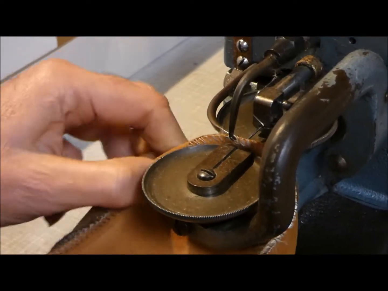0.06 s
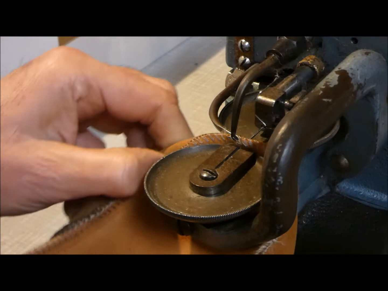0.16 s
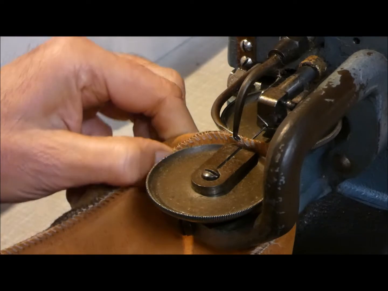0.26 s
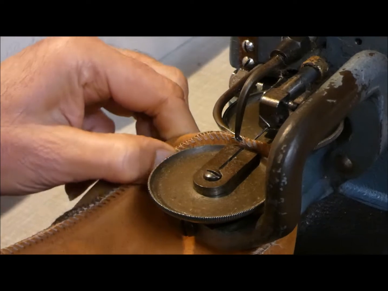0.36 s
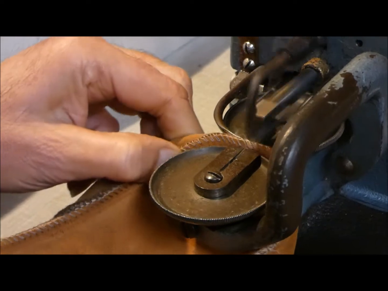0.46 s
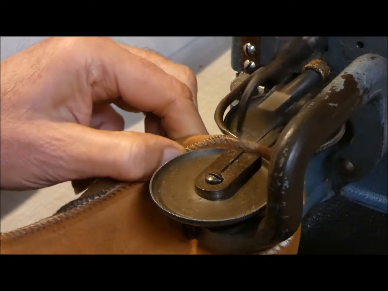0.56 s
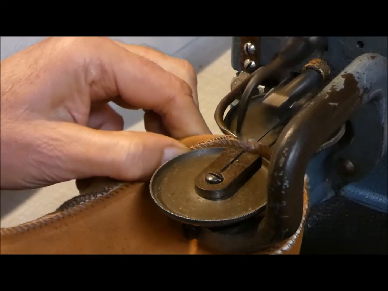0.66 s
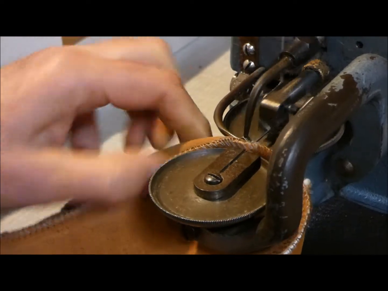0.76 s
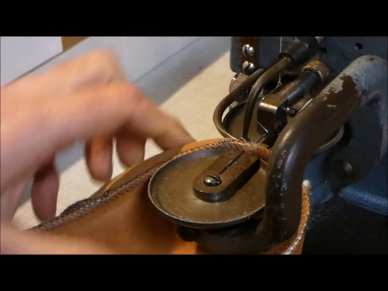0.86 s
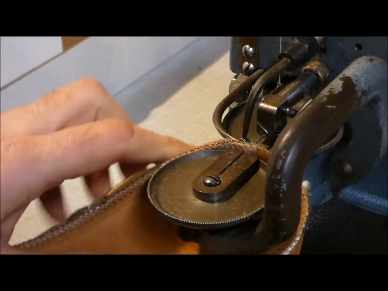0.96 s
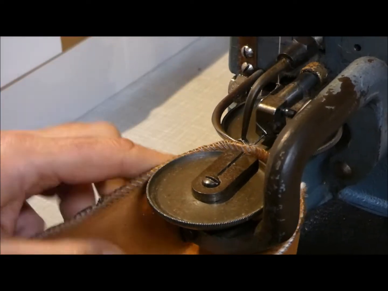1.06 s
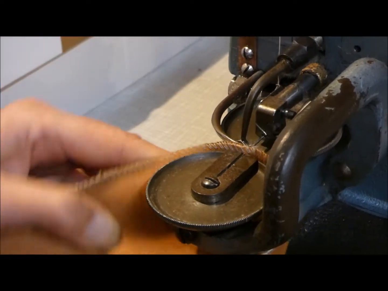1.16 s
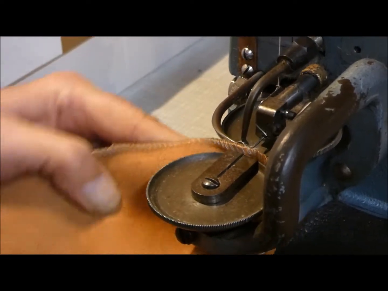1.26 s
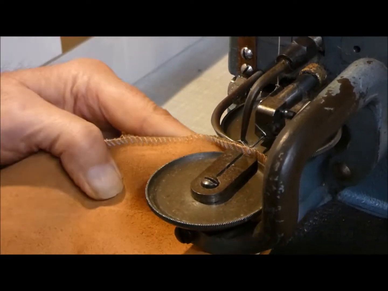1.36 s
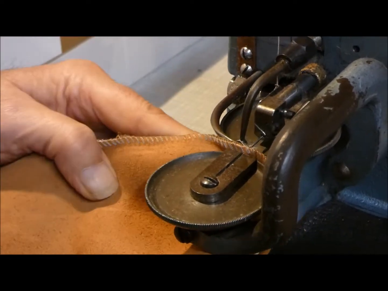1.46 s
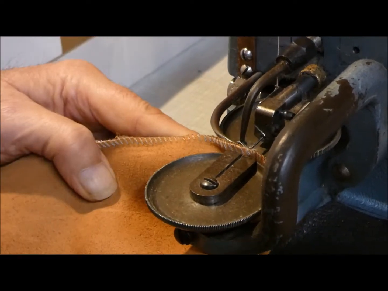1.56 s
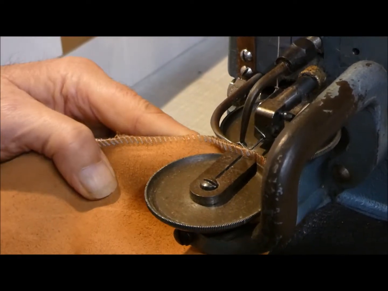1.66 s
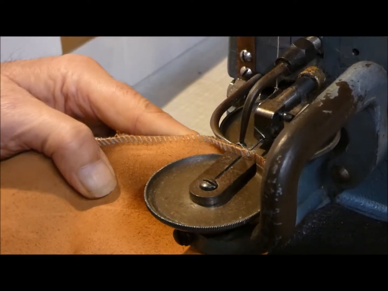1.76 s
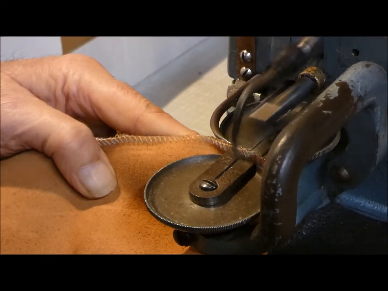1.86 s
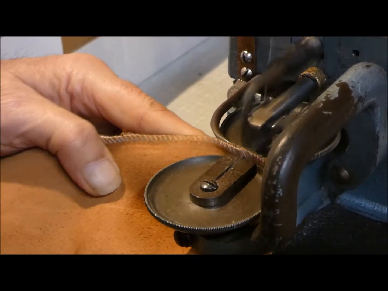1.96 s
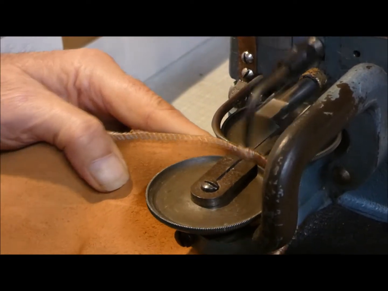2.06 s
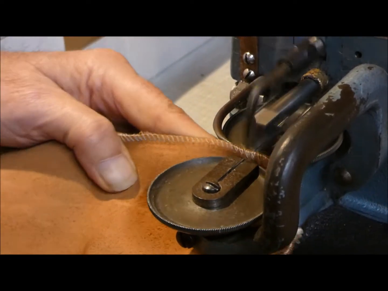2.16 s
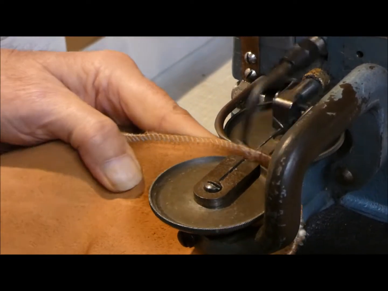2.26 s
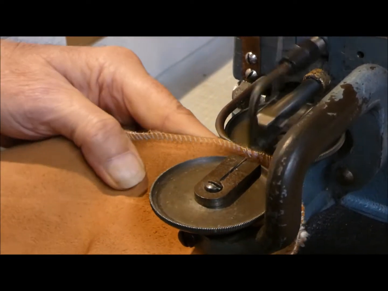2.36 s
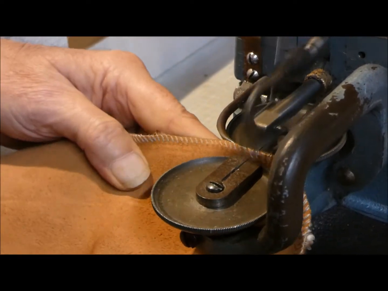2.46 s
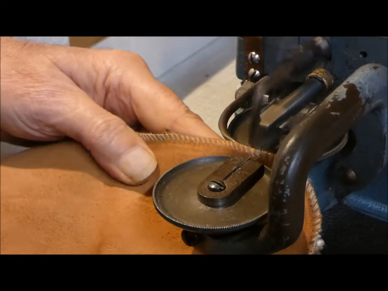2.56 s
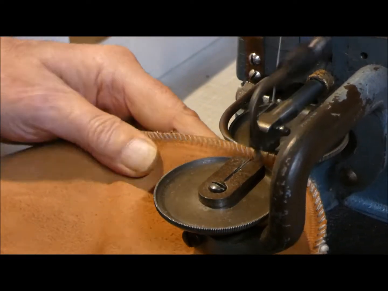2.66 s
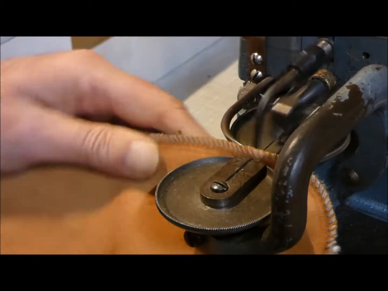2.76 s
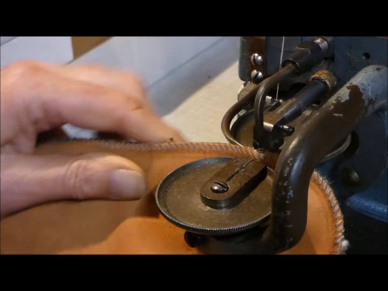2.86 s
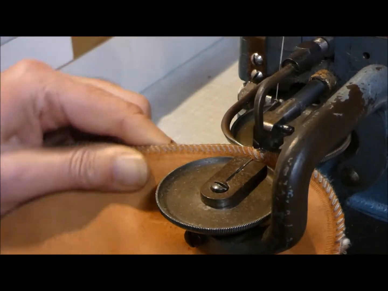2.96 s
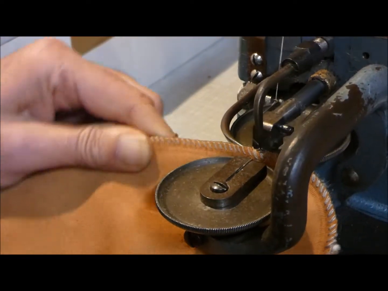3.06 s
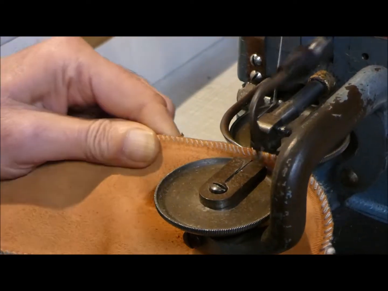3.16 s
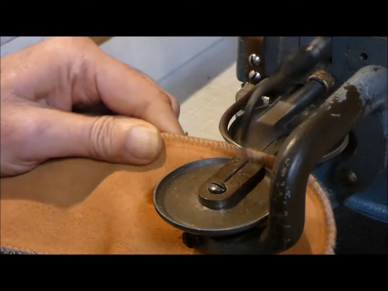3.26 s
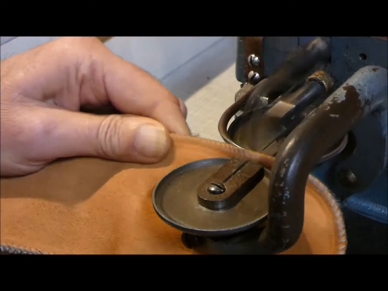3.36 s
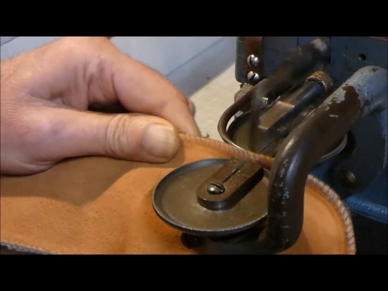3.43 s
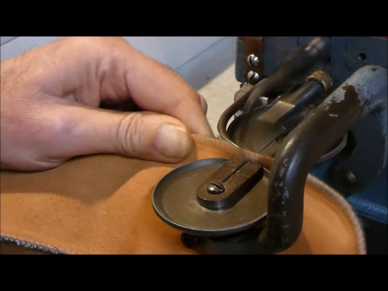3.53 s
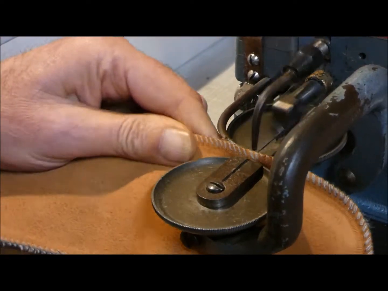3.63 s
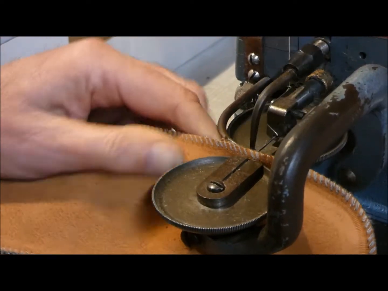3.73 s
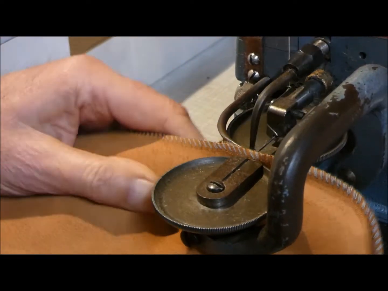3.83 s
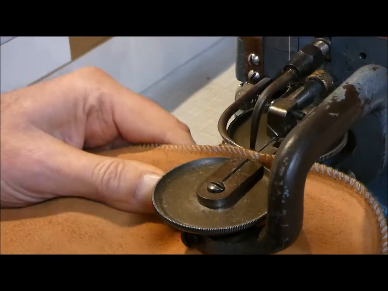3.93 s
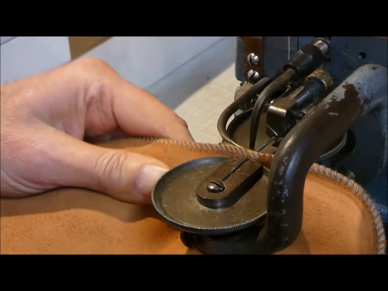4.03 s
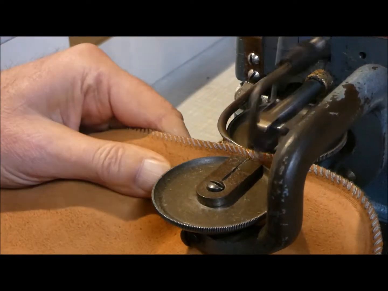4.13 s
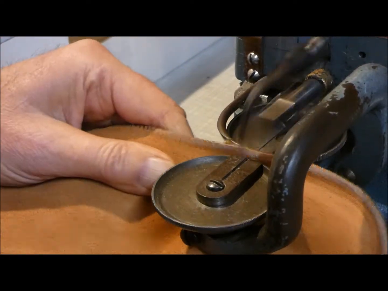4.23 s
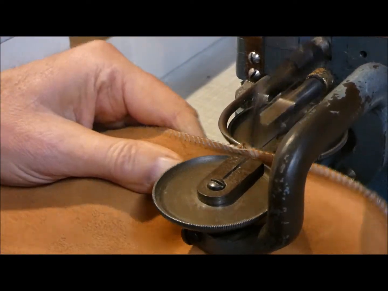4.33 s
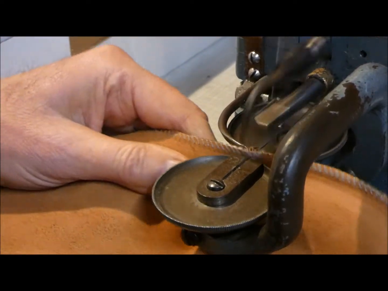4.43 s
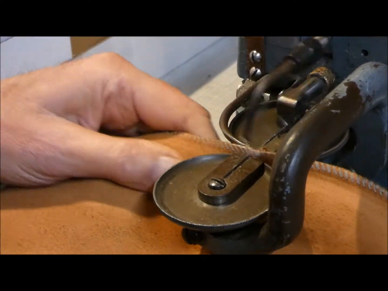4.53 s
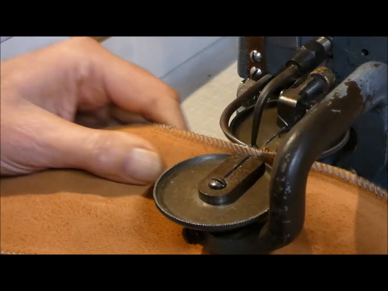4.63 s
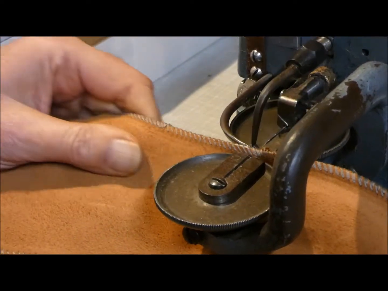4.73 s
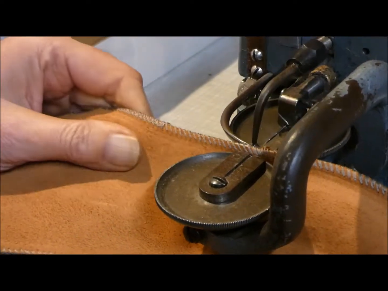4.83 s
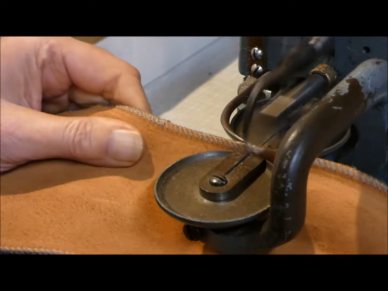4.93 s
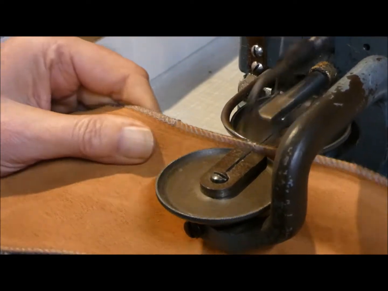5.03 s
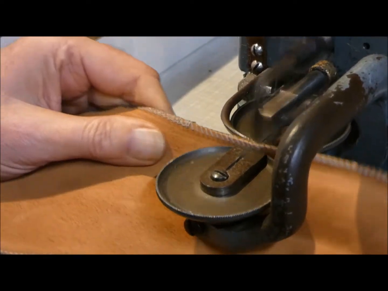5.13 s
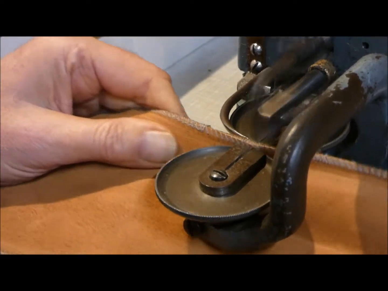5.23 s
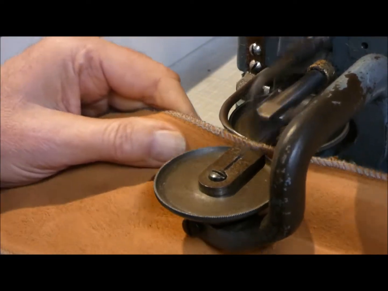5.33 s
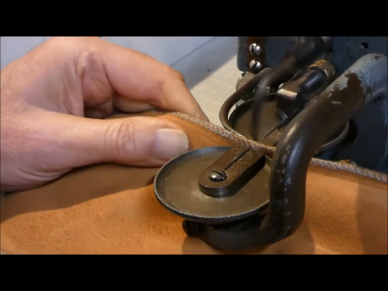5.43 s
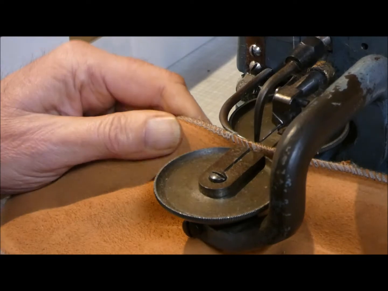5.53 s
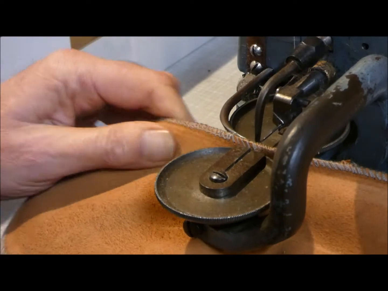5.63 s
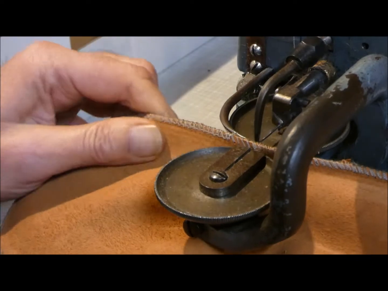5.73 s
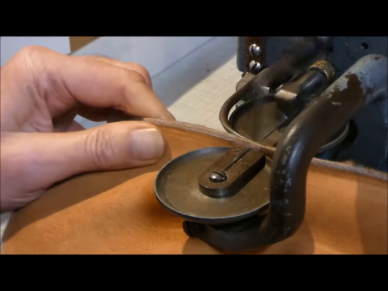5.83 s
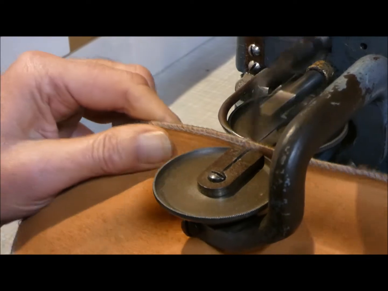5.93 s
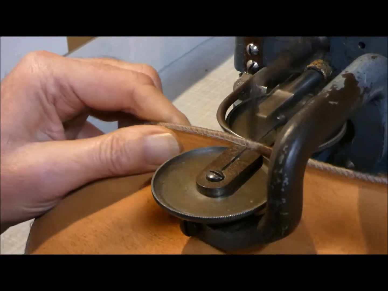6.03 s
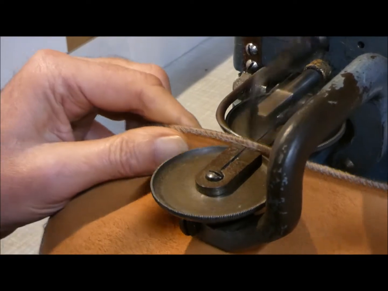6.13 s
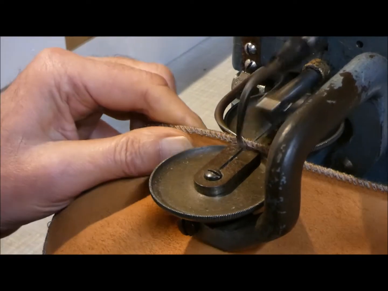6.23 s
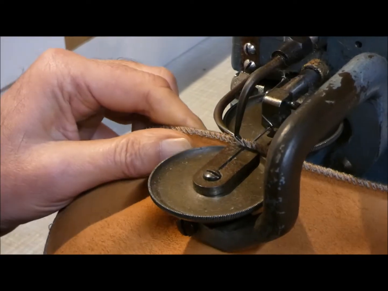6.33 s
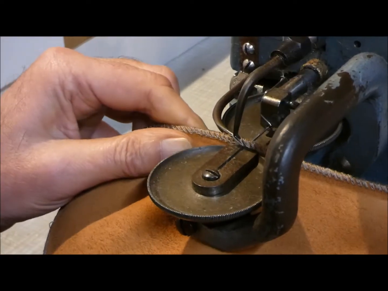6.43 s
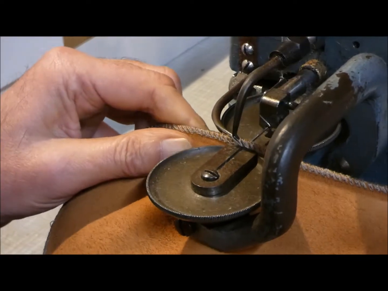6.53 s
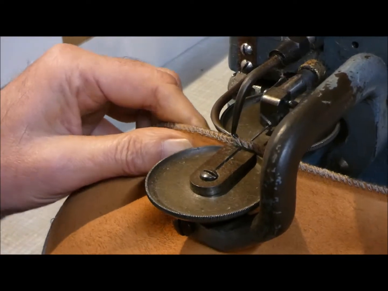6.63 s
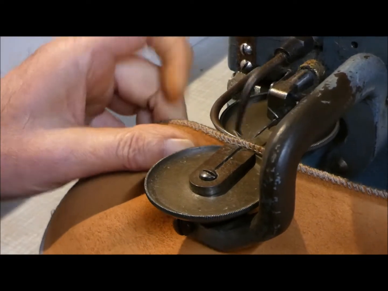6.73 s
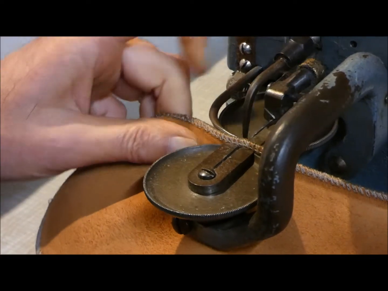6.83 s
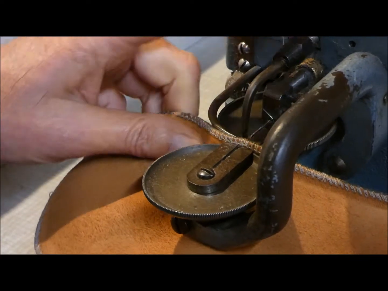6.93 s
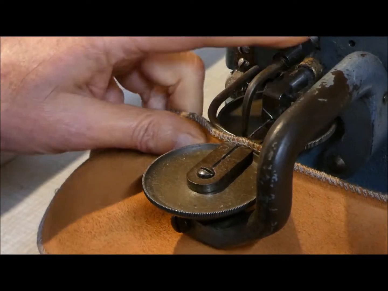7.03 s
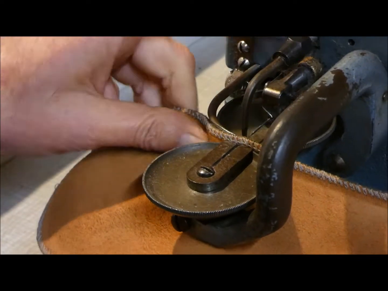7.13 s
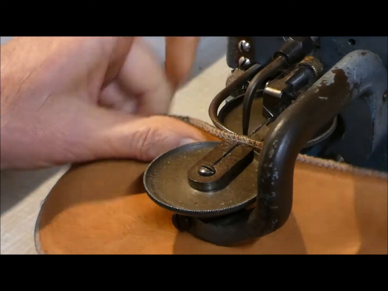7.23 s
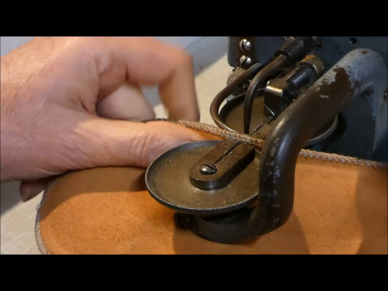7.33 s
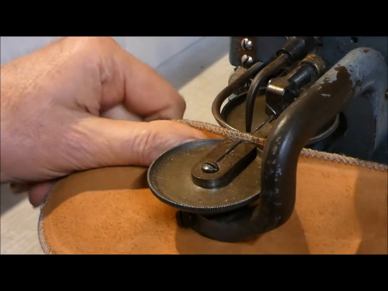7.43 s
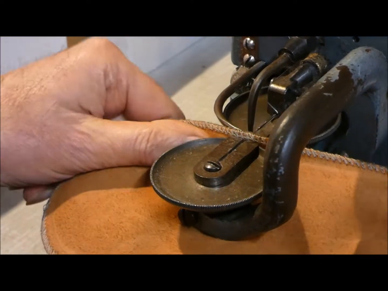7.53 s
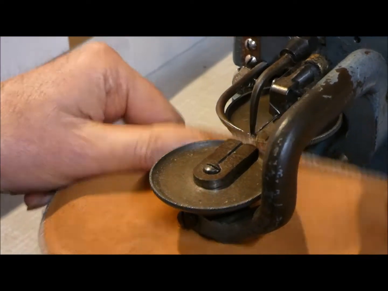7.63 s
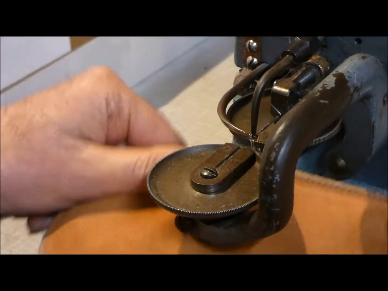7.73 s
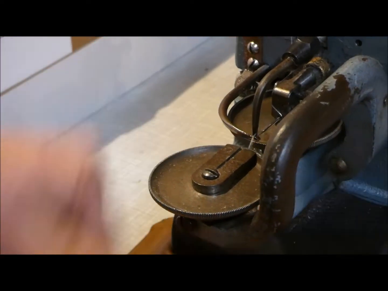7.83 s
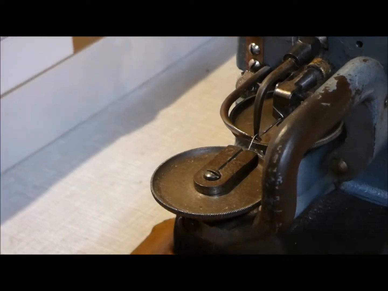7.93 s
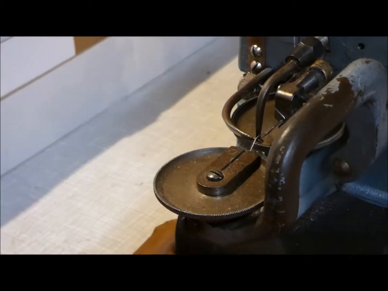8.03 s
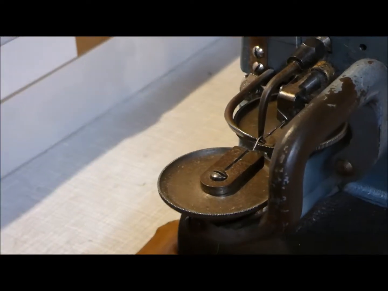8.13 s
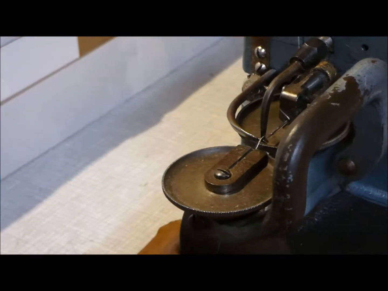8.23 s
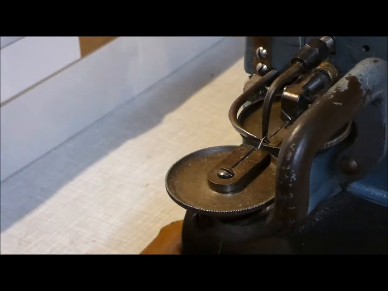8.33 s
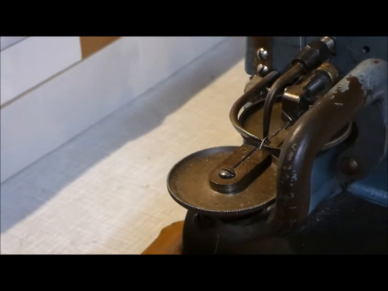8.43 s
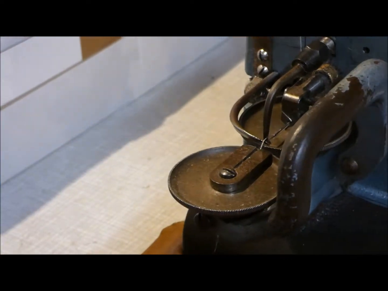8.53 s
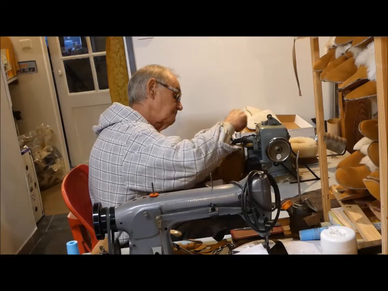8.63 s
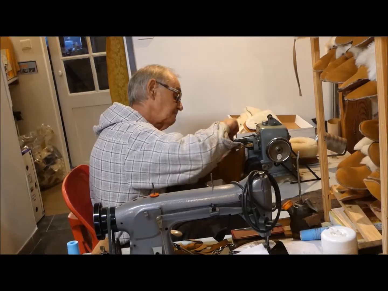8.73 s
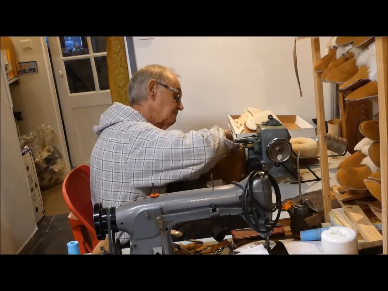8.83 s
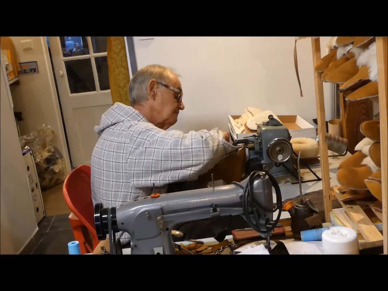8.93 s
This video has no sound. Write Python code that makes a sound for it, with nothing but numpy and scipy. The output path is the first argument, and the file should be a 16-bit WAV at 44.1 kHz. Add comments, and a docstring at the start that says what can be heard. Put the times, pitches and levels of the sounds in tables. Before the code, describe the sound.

An industrial sewing machine stitches leather in seven short, clattering bursts over a faint ticking motor, then thumps, a metal snap and a small squeak.

```python
"""Sewing machine on a leather edge

A clutch-driven industrial machine overstitches leather in seven short bursts in a small workshop.
The motor idles and ticks; at each press the clutch bites and growls through the table while the shaft
speeds up, then coasts. Clatter and shaking grow with shaft speed, and the needle pings once per turn.
At the end come low thumps, the leather slides, the feed disc snaps shut and a pivot squeaks and rasps.
Filtered noise, single impacts and harmonic tones drive resonances of the parts; a short room joins them."""
import sys
import numpy as np
from scipy import signal
from scipy.fft import rfft, irfft
from scipy.io import wavfile
from scipy.ndimage import uniform_filter1d

SR = 44100
rng = np.random.default_rng(int(sys.argv[2]) if len(sys.argv) > 2 else 0)


def generate_wav(sig):
    """Save sig (samples, or channels by samples) to the path in sys.argv[1] as 16-bit PCM at SR."""
    pcm = np.round(np.clip(np.atleast_2d(sig).T, -1, 1) * 32767).astype(np.int16)
    wavfile.write(sys.argv[1], SR, pcm)


N = 396002
TIME = np.arange(N) / SR

# Presses of the pedal: (start [s], held [s], speed pulled towards [stitches/s], coasting [s],
# shaft angle at rest [turns], time for the clutch to bite [s], relative force [dB])
PEDAL_PRESSES = [(.430, .105, 50.8, .511, .745, .054, -17.5), (1.830, .193, 37.4, .557, .438, .055, -17.5),
                 (2.388, .156, 40.9, .554, .554, .05, -18.5), (3.180, .346, 39.8, .361, .687, .06, -16.5),
                 (4.139, .306, 38.6, .331, .411, .045, -19), (4.902, .435, 40.8, .343, .329, .054, -18),
                 (5.790, .353, 44.7, .301, .288, .045, -18.5)]
# The spinning flywheel brushes the open clutch: (time [s])
CLUTCH_TICKS = [.142, .302, 0.782, 1.024, 1.221, 1.423, 1.502, 1.622, 1.741, 2.343, 2.822, 2.9, 3.022,
                3.822, 4.102, 5.702, 6.621, 6.782, 6.902, 7.222, 8.728, 8.889]
# The linkage takes up its slack with a light clink: (time [s], relative level [dB])
LINKAGE_CLINKS = [(.430, -34.5), (2.388, -36), (3.180, -35), (3.810, -42.5), (3.824, -44), (4.139, -31.5),
                  (4.902, -34), (5.790, -34), (7.622, -58), (7.657, -47), (7.729, -29.5), (7.748, -42),
                  (7.775, -57)]
# Low thumps of the pedal lever and of handling at the table: (time [s], relative level [dB])
LOW_THUMPS = [(7.328, -36.5), (7.400, -15), (7.408, -24.5), (7.625, -33), (7.69, -35), (7.772, -32.5)]
# The feed disc snaps shut: (time [s], relative level [dB])
DISC_SNAPS = [(7.8695, -21)]
# The pedal rod knocks dully against the clutch: (time [s], relative level [dB])
ROD_KNOCKS = [(7.329, -7.5)]
# Leather slides under the hand: (start [s], length [s], relative level [dB])
LEATHER_SLIDES = [(0.97, 0.49, -54), (6.725, 0.061, -45.5), (7.012, 0.039, -54), (7.108, 0.07, -44),
                  (7.281, 0.074, -45), (7.588, 0.55, -41.5), (8.861, 0.062, -45.5)]
# Leather chirps on the steel disc: (centre [s], half length [s], frequency [Hz], relative level [dB])
LEATHER_CHIRPS = [(7.705, 0.0098, 4980, -35.5), (7.757, 0.011, 4400, -42)]
# Dry pivot squeak: (time [s], stick-slip rate [Hz], relative level [dB])
PIVOT_SQUEAK = [(8.342, 772, -51), (8.362, 860, -49), (8.385, 924, -41.5), (8.402, 910, -44),
                (8.425, 905, -50)]
# The same pivot rasping: (start [s], end [s], relative level [dB])
PIVOT_RASPS = [(8.401, 8.455, -45.5), (8.504, 8.615, -41)]

# Resonances of the work table: (frequency [Hz], width [Hz], relative level [dB])
TABLE_MODES = [(199.5, 8, 3.5), (292.4, 18, 1.5), (376.5, 19.6, 1.5), (561, 20.5, -7), (606, 31, -10.5),
               (721, 105, -12.5), (930, 133, -12), (1064, 280, -15)]
# Resonances of the cast machine head: (frequency [Hz], width [Hz], relative level [dB])
HEAD_MODES = [(133, 17, 17.5), (620, 67, 18), (1100, 135, 6.5), (3064, 260, -22), (5070, 260, -34)]
# Resonances of the motor: (frequency [Hz], width [Hz], relative level [dB])
MOTOR_MODES = [(268, 34, 1), (413.3, 33, 6), (652, 174, 0), (1440, 56, 3.5), (2170, 510, -7)]
# Resonances of the clutch: (frequency [Hz], width [Hz], relative level [dB])
CLUTCH_MODES = [(540, 104, 6), (1370, 202, 9.5), (2224, 164, 4), (3200, 270, -10.5)]
# Resonances of the linkage: (frequency [Hz], width [Hz], relative level [dB])
LINKAGE_MODES = [(1170, 60, 10.5), (2820, 50, -6), (4060, 79, -4), (5080, 78, -22)]
# Resonances of the stand: (frequency [Hz], width [Hz], relative level [dB])
STAND_MODES = [(187, 23, 9.5), (277.3, 19.6, 14), (409, 92, 2), (778, 79, -1.5), (945, 34, -3.5),
               (1490, 480, -11), (2070, 220, -8.5), (4270, 600, -17.5), (5500, 1300, -26.5)]
# Resonances of the feed disc: (frequency [Hz], width [Hz], relative level [dB])
DISC_MODES = [(254, 100, 11), (836, 130, 16.5), (1110, 126, 17), (2240, 67, 17), (2470, 140, 8.5),
              (6050, 2300, -1), (11400, 91, -2)]
# Resonances of the dry pivot: (frequency [Hz], width [Hz], relative level [dB])
PIVOT_MODES = [(580, 50, 8.5), (1300, 150, 6), (2440, 270, 3), (3630, 170, -1.5), (4960, 480, -10.5)]

# Broad spectrum of steel striking steel: (frequency [Hz], relative level [dB])
STEEL_SPECTRUM = [(50, 2), (130, 10), (1500, 8), (3600, 1), (5200, 1), (8000, -7.5), (11500, -11),
                  (12500, -58), (15500, -18.5)]
# Broad spectrum of sliding hide: (frequency [Hz], relative level [dB])
LEATHER_SPECTRUM = [(100, 0.5), (500, 12.5), (3500, -4.5), (5800, -6.5), (8000, -14), (15000, -31)]
# Spectrum of the room air: (frequency [Hz], relative level [dB])
AIR_SPECTRUM = [(25, -23), (100, 9), (400, 7.5), (2400, -21), (6000, -9.5), (11000, -15.5), (15000, -36)]
# Spectrum of the rumbling floorboards: (frequency [Hz], relative level [dB])
BOARDS_SPECTRUM = [(25, -7), (70, 2), (110, 1), (250, -35), (1000, -70)]
# The table top muffles the motor below it: (frequency [Hz], gain [dB])
UNDER_TABLE = [(100, 1.5), (300, 1.5), (2600, -5), (8000, -12), (15000, -53)]
# Motor hum under load: (multiple of the pull rate, relative level [dB])
HUM_PARTIALS = [(1, -14), (2, 5.5), (3, -9), (4, -1.5)]

PULL_HZ, MOTOR_HZ = 100, 25   # magnetic pulls and motor turns per second
SPIN_UP_S = .2345   # time constant of the shaft gathering speed
FIRST_TOUCH_DB, LET_GO_S = -19, 0.072   # clutch force at first touch, and time constant of its release
SLIP_POWER = 0.54   # clutch force falls as the shaft catches up with the motor
FULL_SPEED = 33.15   # reference speed [stitches/s]
SHAKE_DB, SHAKE_POWER = -29, 1.43   # table shaking at full speed, and its growth with speed
CLATTER_DB, CLATTER_POWER = -27.5, 1.163   # relative level of the mechanism's clatter, and its growth
CLATTER_FROM = 1.74   # below this speed [stitches/s] the mechanism makes no clatter
SWAY_S = 0.088   # time constant of the table's shaking
PING_HZ, CUTOFF_HZ = 11400, 15800   # needle pitch; upper limit of the finished sound


def from_db(db):
    """Decibels to gain."""
    return 10 ** (np.asarray(db) / 20)


def rms_one(x):
    """Scale to unit rms."""
    return x / np.sqrt(np.mean(x ** 2) + 1e-20)


def evened(x, seconds):
    """Hold the short-term rms near one."""
    power = np.abs(uniform_filter1d(x ** 2, int(seconds * SR) + 1))
    return x / np.sqrt(power + 1e-9)


def noise():
    """White noise."""
    return rng.standard_normal(N)


def drift(rate):
    """Random wander with `rate` new values a second, joined by straight lines; unit rms."""
    return rms_one(np.interp(TIME * rate, np.arange(4000), rng.standard_normal(4000)))


def grains(per_s, spread_db):
    """Random clicks of uneven size and sign."""
    clicks = rng.random(N) < per_s / SR
    sizes = from_db(spread_db * np.minimum(rng.exponential(1, N), 4))
    return clicks * sizes * rng.choice([-1, 1], N)


def resonate(x, modes):
    """Parallel two-pole resonances with alternating signs."""
    out = np.zeros(N)
    for k, (hz, width, db) in enumerate(modes):
        r = np.exp(-np.pi * width / SR)   # pole radius: a wider mode dies faster
        gain = (-1) ** k * from_db(db) * (1 - r * r) / 2
        poles = [1, -2 * r * np.cos(2 * np.pi * hz / SR), r * r]
        out += signal.lfilter([gain, 0, -gain], poles, x + 1e-18)
    return out


def colour(x, spectrum, size=2048):
    """Causal (minimum-phase) filter with the given spectrum, built by folding its cepstrum."""
    hz, db = np.transpose(spectrum)
    bins = np.maximum(np.fft.rfftfreq(size, 1 / SR), 1)
    cepstrum = irfft(np.log(from_db(np.interp(np.log(bins), np.log(hz), db))))
    cepstrum[1:size // 2] *= 2
    cepstrum[size // 2 + 1:] = 0
    impulse = irfft(np.exp(rfft(cepstrum)))
    return signal.oaconvolve(x, impulse)[:N]


def high_pass(x, hz, order=2):
    """Thin out what lies below hz."""
    return signal.sosfilt(signal.butter(order, hz, "high", fs=SR, output="sos"), x)


def contacts(events, rise_s, decay_s, chatter):
    """Force of each (time [s], level [dB]) blow: one impact, then a dying chatter of the parts."""
    out, age = np.zeros(N), np.arange(SR // 4) / SR
    shape = (1 - np.exp(-age / rise_s)) * np.exp(-age / decay_s)
    for s, db in events:
        force = shape * rng.standard_normal(len(age))
        force *= chatter / np.linalg.norm(force)
        force[0] += 1
        at = int(s * SR)
        out[at:at + len(age)] += from_db(db) * force[:N - at]
    return out


def shaft():
    """Speed, angle and clutch force: the shaft gathers speed while the pedal is held, then coasts to rest."""
    speed, turns, grip = np.zeros((3, N))
    for start, held, top, coast, angle, bite, db in PEDAL_PRESSES:
        at = int(start * SR)
        age = TIME[:N - at]
        slip = np.exp(-np.minimum(age, held) / SPIN_UP_S)
        coasting = np.clip(1 - (age - held) / coast, 0, 1) ** 2
        speed[at:] = top * (1 - slip) * coasting
        turns[at:] = angle + np.cumsum(speed[at:]) / SR
        biting = from_db(db + FIRST_TOUCH_DB * np.maximum(1 - age / bite, 0))
        release = np.exp(-np.clip((age - held) / LET_GO_S, 0, 20))
        grip[at:] = biting * slip ** SLIP_POWER * release
    return speed, turns, grip


def stitches(turns):
    """One stitch whenever the shaft angle passes a whole turn: its moments [s]."""
    return TIME[1:][np.diff(np.floor(turns)) > 0]


def table_shake(speed):
    """The unbalanced shaft rocks the table, which follows it with some lag."""
    keep = np.exp(-1 / (SWAY_S * SR))
    imbalance = (speed / FULL_SPEED) ** SHAKE_POWER
    return from_db(SHAKE_DB) * signal.lfilter([1 - keep], [1, -keep], imbalance + 1e-18)


def drive(load, grip, turns, hum_db=-3, shudder_db=1, wobble=0.055, judder=0.43, stroke_db=1.5):
    """The loaded motor hums, and the slipping clutch judders the table with every magnetic pull."""
    phase = 2 * np.pi * PULL_HZ * TIME + wobble * drift(25)   # wobble in radians
    partials = [from_db(db) * np.sin(k * phase + rng.uniform(0, 2 * np.pi)) for k, db in HUM_PARTIALS]
    tone = rms_one(sum(partials))
    friction = noise() * (1 + judder * np.cos(phase))
    table = evened(high_pass(resonate(friction, TABLE_MODES), 107, order=3), 0.0208)
    strain = np.sqrt(grip / grip.max())   # the hum stands out only when the clutch grips hard
    stroke = from_db(stroke_db * np.cos(2 * np.pi * turns))   # the load peaks once per stitch
    hum = from_db(hum_db) * strain * tone
    shudder = from_db(shudder_db) * stroke * table
    return load * (hum + shudder)


def jolt(jolt_db=40):
    """The clutch bites with a jerk that shakes the table."""
    bites = [(start + bite, db) for start, *_, bite, db in PEDAL_PRESSES]
    blows = contacts(bites, rise_s=.002, decay_s=0.011, chatter=0.21)
    return from_db(jolt_db) * resonate(blows, TABLE_MODES)


def punch(load, turns, punch_db=37):
    """The needle is driven through the hide and jolts the table."""
    entries = [(s, punch_db) for s in stitches(turns)]
    blows = contacts(entries, rise_s=.002, decay_s=0.0033, chatter=0.96)
    return resonate(blows * load, TABLE_MODES)


def mechanism(clatter, turns, level_db=6, slide=0.57, cam_s=0.0013, head_db=-2, flicker_db=1.0, count=5):
    """Cams strike at fixed shaft angles, and needle bar and looper rattle in the cast head between them."""
    passing = np.diff(np.floor(count * turns), prepend=0) > 0   # `count` strikes per turn
    strikes = passing * np.minimum(rng.exponential(1, N), 2)
    cams = .35 * signal.lfilter([1], [1, -np.exp(-1 / (cam_s * SR))], strikes + 1e-18)
    rattle = evened(grains(1500, spread_db=2) + (slide + cams) * noise(), 0.02)
    rattle *= from_db(1.66 * np.cos(2 * np.pi * (turns + 0.06)))   # loudest just before the needle enters
    ringing = np.zeros(N)
    for mode in HEAD_MODES:
        # the points of contact keep moving, so each resonance is struck more or less hard
        flicker = from_db(flicker_db * drift(26))
        ringing += resonate(rattle * flicker, [mode])
    steel = colour(rattle, STEEL_SPECTRUM)
    return from_db(level_db) * clatter * rms_one(steel + from_db(head_db) * ringing)


def needle(clatter, turns, ping_db=21, clack_db=-6, growth=0.96):
    """Once per stitch the needle pings and the looper clacks; both grow less with speed than the rattle does."""
    blows = contacts([(s, 0) for s in stitches(turns)], rise_s=0.003, decay_s=0.0034, chatter=3.1)
    blows *= clatter ** growth
    mode = [(PING_HZ, 700, 0)]   # 700 Hz wide
    ping = resonate(resonate(blows, mode), mode)
    clack = colour(blows, STEEL_SPECTRUM)
    return from_db(ping_db) * ping + from_db(clack_db) * clack


def levers(clink_db=16, ring_db=29, thump_db=40, knock_db=12, snap_db=28, crack_db=17):
    """Clinks, low thumps and the disc snap: ringing modes plus a broad crack of steel."""
    clinks = contacts(LINKAGE_CLINKS, rise_s=0.0014, decay_s=0.0087, chatter=1.93)
    thumps = contacts(LOW_THUMPS, rise_s=0.00034, decay_s=0.041, chatter=1.56)
    snaps = contacts(DISC_SNAPS, rise_s=0.00047, decay_s=0.017, chatter=0.8)
    impacts = from_db(clink_db) * clinks + from_db(knock_db) * thumps + from_db(crack_db) * snaps
    cracks = colour(impacts, STEEL_SPECTRUM)
    linkage = from_db(ring_db) * resonate(clinks, LINKAGE_MODES)
    stand = from_db(thump_db) * resonate(thumps, STAND_MODES)
    disc = from_db(snap_db) * resonate(snaps, DISC_MODES)
    return high_pass(cracks + linkage + stand + disc, 78)


def pedal_rod():
    """A dull knock with a short rattle, ringing in the clutch housing."""
    knocks = contacts(ROD_KNOCKS, rise_s=0.0016, decay_s=0.011, chatter=2.5)
    return resonate(resonate(knocks, CLUTCH_MODES), [(1100, 710, 0)])   # a broad mode dulls it


def leather(peak_share=0.29, chirp_width_hz=50):
    """The grain of the hide catches and slips in short strokes; drawn past the disc it chirps."""
    strokes = np.zeros(N)
    for s, length, db in LEATHER_SLIDES:
        strokes += from_db(db) * np.interp(TIME, [s, s + peak_share * length, s + length], [0, 1, 0])
    out = strokes * rms_one(colour(grains(4000, spread_db=3.5), LEATHER_SPECTRUM))
    for s, half_length, hz, db in LEATHER_CHIRPS:
        swell = np.exp(-((TIME - s) / half_length) ** 2)
        whistle = evened(resonate(noise(), [(hz, chirp_width_hz, 0)]), 0.0092)
        out += from_db(db) * swell * whistle
    return out


def pivot(squeak_db=0.0, jitter=0.0092):
    """Regular stick-slip squeaks; irregular slips rasp through the same resonances."""
    s, hz, db = np.transpose(PIVOT_SQUEAK)
    rate = np.interp(TIME, s, hz) * (1 + jitter * drift(300))
    cycles = np.cumsum(rate) / SR
    slips = sum(np.sin(2 * np.pi * k * cycles) for k in range(2, 8))   # harmonics 2 to 7
    level = from_db(squeak_db + np.interp(TIME, s, db, left=-120, right=-120))
    squeak = evened(resonate(slips, PIVOT_MODES), 0.0104) * level
    rub = np.zeros(N)
    for start, end, rasp_db in PIVOT_RASPS:
        rub += from_db(rasp_db) * np.interp(TIME, [start - .002, start, end, end + .002], [0, 1, 1, 0])
    return squeak + rub * rms_one(resonate(grains(2300, spread_db=0.0), PIVOT_MODES))


def idle_motor(level_db=-50, tick_db=-30.5, low_hz=190):
    """Bearings rumble unevenly; the flywheel grazes the clutch on every turn and at times brushes it harder."""
    waver = from_db(3 * drift(45))
    rumble = from_db(level_db) * waver * rms_one(resonate(noise(), MOTOR_MODES))
    touches = np.zeros(N)
    grazes = np.arange(CLUTCH_TICKS[0] % (1 / MOTOR_HZ), TIME[-1], 1 / MOTOR_HZ)
    touches[(grazes * SR).astype(int)] = from_db(tick_db + rng.uniform(-26, -10, len(grazes)))
    touches[(np.array(CLUTCH_TICKS) * SR).astype(int)] = from_db(tick_db)
    age = np.arange(SR // 20) / (SR * .003)   # in units of 3 ms
    brush = (age * np.exp(1 - age)) ** 2   # swells and dies within milliseconds
    pressure = signal.oaconvolve(touches, brush)[:N]
    ticks = pressure * evened(resonate(noise(), CLUTCH_MODES), 0.0032)
    return high_pass(colour(rumble + ticks, UNDER_TABLE), low_hz)


def workshop(x, t60_s=0.1, wet_db=-4, low_hz=850):
    """Dense decaying reflections, different at each ear; the bass stays mostly direct."""
    age = np.arange(SR // 2) / SR
    tails = rng.standard_normal((2, len(age))) * from_db(-60 * age / t60_s) * (age > .002)
    tails /= np.linalg.norm(tails, axis=1, keepdims=True)
    send = high_pass(x, low_hz, order=1)[None]
    return x + from_db(wet_db) * signal.oaconvolve(send, tails, axes=1)[:, :N]


def diffuse(spectrum, apart=0.97):
    """Stereo noise of the given spectrum, almost independent at each ear; unit rms."""
    middle = colour(noise(), spectrum)
    side = colour(noise(), spectrum)
    return rms_one(middle + apart * side * [[1], [-1]])


def surroundings(load, air_db=-62, boards_db=-31):
    """The faint air of the room, and floorboards that rumble under the working machine."""
    air = from_db(air_db) * diffuse(AIR_SPECTRUM)
    return air + from_db(boards_db) * load * diffuse(BOARDS_SPECTRUM)


def scene():
    """Machine, handling and idling motor in one room; shaking and clatter follow the speed of the shaft."""
    speed, turns, grip = shaft()
    clatter_speed = np.maximum(speed - CLATTER_FROM, 0) / FULL_SPEED
    clatter = from_db(CLATTER_DB) * clatter_speed ** CLATTER_POWER
    load = np.hypot(grip, table_shake(speed))
    machine = drive(load, grip, turns) + jolt() + punch(load, turns)
    machine += mechanism(clatter, turns) + needle(clatter, turns)
    handling = levers() + pedal_rod() + leather() + pivot()
    return workshop(machine + handling + idle_motor()) + surroundings(load)


def record(dry):
    """The microphone thins the lowest bass; a steep low-pass cuts the top."""
    thinned = high_pass(dry, 55, order=2)
    return signal.sosfilt(signal.ellip(10, .1, 80, CUTOFF_HZ, fs=SR, output="sos"), thinned)


dry = scene()
out = record(dry)
generate_wav(out)
```